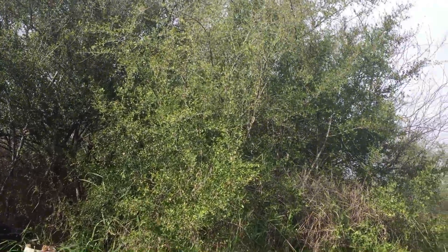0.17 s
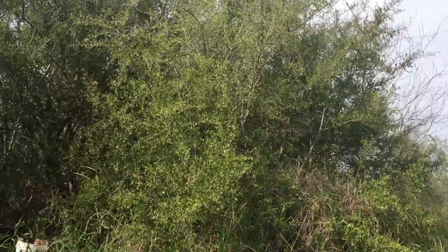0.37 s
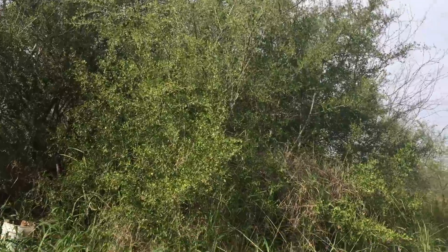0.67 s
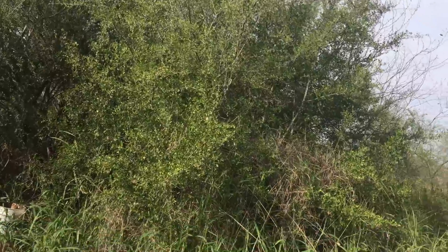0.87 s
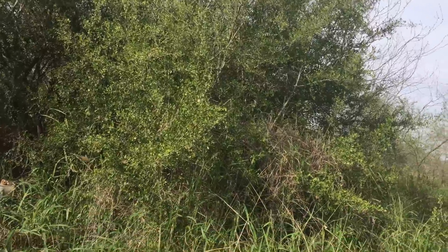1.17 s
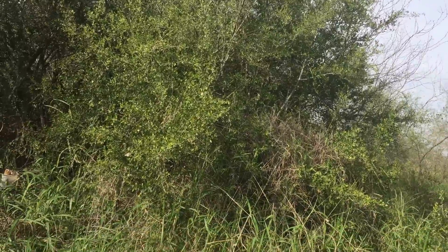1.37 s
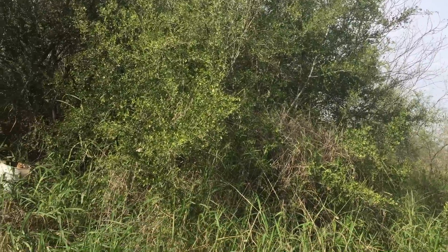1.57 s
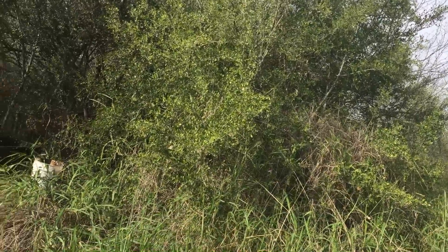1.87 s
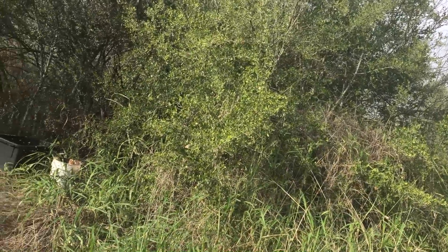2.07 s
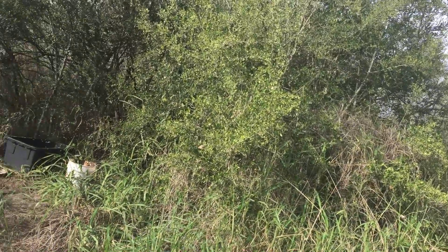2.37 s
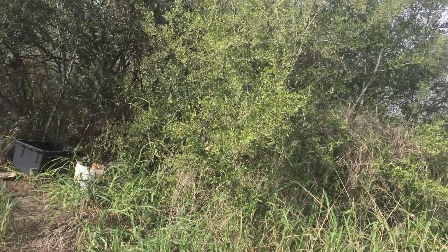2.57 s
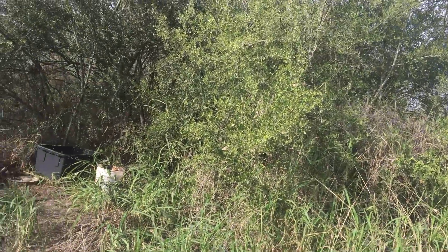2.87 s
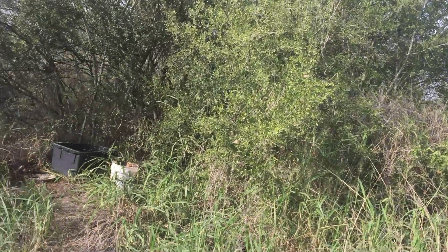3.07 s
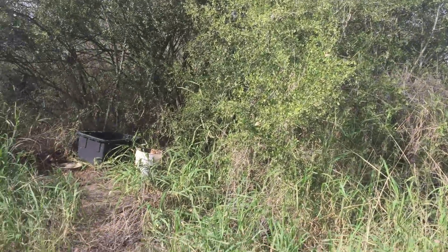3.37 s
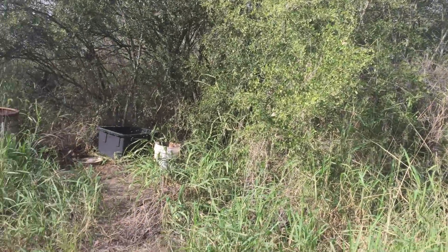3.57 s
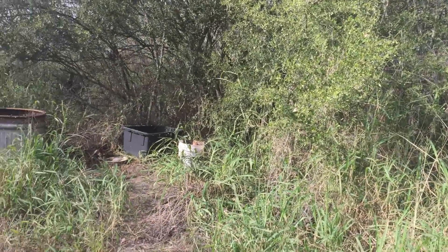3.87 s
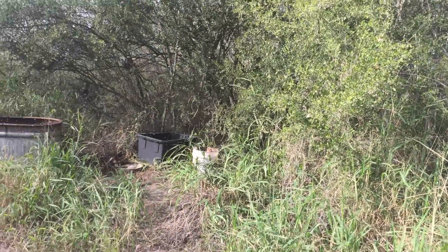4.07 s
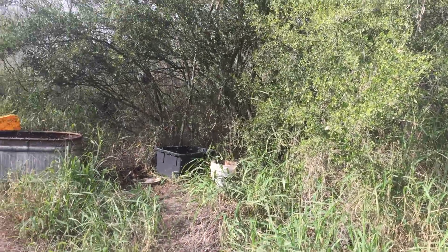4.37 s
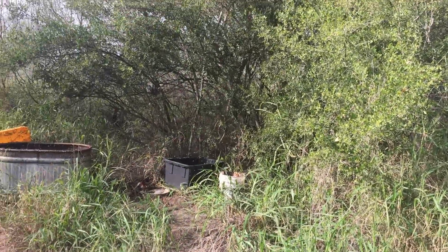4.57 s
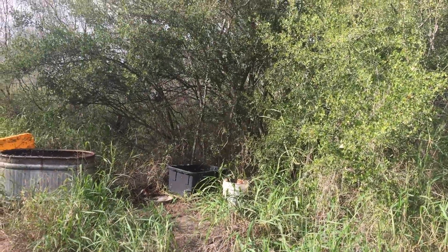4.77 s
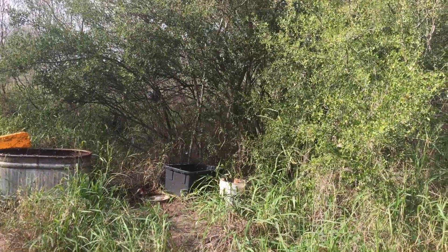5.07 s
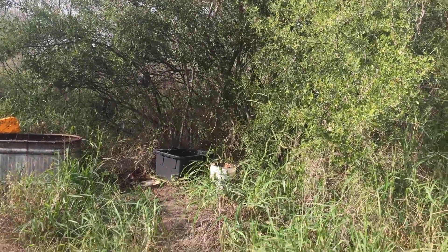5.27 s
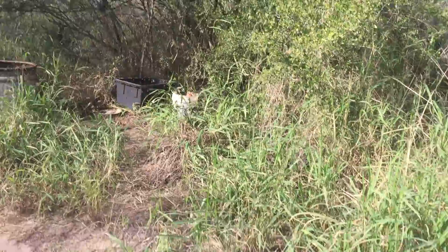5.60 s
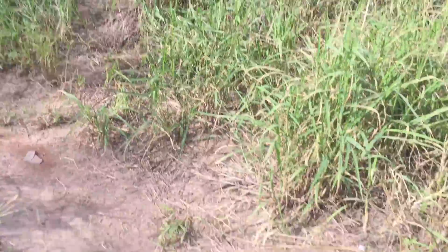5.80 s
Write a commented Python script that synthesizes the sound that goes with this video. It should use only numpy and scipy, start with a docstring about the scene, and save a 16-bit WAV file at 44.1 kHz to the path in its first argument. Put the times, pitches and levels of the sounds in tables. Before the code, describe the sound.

Outdoors among bushes and tall grass, someone bangs metal on metal with a steady arm, about seventeen blows in six seconds. Every hit is bright, harsh and quickly damped, leaving a thin hum of ringing metal. Beneath are very faint air, stirring leaves and a tiny high whine. The mono microphone overloads a little on the loudest peaks.

```python
"""A hard, dense clang comes first, repeated nearly three times a second: sheet metal struck in open brush.
Each blow excites damped modes, a circling bending wave and a decaying noise of many weaker modes.
Freely hanging metal, a sum of longer modes, rings on faintly until the next blow; a crack and a low
push mark each contact. Bushes scatter a brief diffuse tail, over quiet air, stirring leaves and a thin
high whine made of sines. Saturation of the microphone input flattens the loudest peaks."""
import sys
import numpy as np
from scipy import signal
from scipy.fft import rfft, irfft, next_fast_len
from scipy.io import wavfile
from scipy.ndimage import map_coordinates

SR = 44100
rng = np.random.default_rng(int(sys.argv[2]) if len(sys.argv) > 2 else 0)


def wav_out(sig):
    """Save sig, one row per channel (or a flat mono array), as 16-bit PCM at SR to the path in sys.argv[1]."""
    wavfile.write(sys.argv[1], SR, np.round(np.clip(np.atleast_2d(sig).T, -1, 1) * 32767).astype(np.int16))


N = 261954  # length [samples]

# blows of a steady arm, all nearly alike; every struck source plays them: (time [s], force [dB])
BLOWS = [(-.004, -2), (0.3598, -2.3), (0.7142, -1.96), (1.0598, -1.5), (1.4157, -1.5), (1.775, -1.7),
         (2.1270, -1.8), (2.484, -1.9), (2.8383, -1.5), (3.1979, -1.4), (3.5533, -1), (3.884, -1.2),
         (4.2268, -1.3), (4.5754, -1.3), (4.9195, -1.94), (5.2573, -1.6), (5.6132, -0.6)]
# damped modes of the struck sheet: (frequency [Hz], relative level [dB], t60 [s])
SHEET_MODES = [(502, -25, 0.24), (569, -22, 0.14), (712, -18, 0.16), (739, -16, 0.26), (816, -22, 0.29),
               (947, -15, 0.22), (1047, -22, 0.3), (1156, -26, 0.2), (1182, -17, 0.16), (1228, -26, 0.3),
               (1281, -25, 0.22), (1369, -11, 0.08), (1413, -24, 0.3), (1477, -14, 0.13), (1562, -23, 0.3),
               (1609, -16, 0.21), (1639, -14, 0.26), (1706, -23, 0.24), (1777, -23, 0.26), (2037, -17, 0.2),
               (2080, -13, 0.08), (2307, -21, 0.24), (2540, -14, 0.14), (2785, -12, 0.08),
               (2914, -24, 0.25), (3001, -16, 0.15), (3197, -21, 0.16), (3647, -17, 0.12),
               (4435, -18, 0.12), (4630, -17, 0.14)]
# spectrum of the sheet's crowd of overlapping modes: (frequency [Hz], relative density [dB per Hz])
CROWD_SPECTRUM = [(270, -18), (430, -6.5), (1050, -1.5), (1400, 2.5), (2300, -2), (2950, 0.5), (4250, -3),
                  (4700, 0), (5080, -4.5), (5450, 1), (5800, -4), (7400, -8), (8600, -12.5), (15500, -19)]
# how fast the crowd dies: (frequency [Hz], t60 [s])
CROWD_DECAY = [(300, 0.21), (1500, 0.22), (3000, 0.19), (6000, 0.13), (10000, 0.13), (15000, 0.11)]


def clang(crowd_db=-3, sheet_db=1.22, wave_db=-8.5, change=0.33, spread_s=.002, detune=0.0017):
    """Modal superposition: a blow sets off strong modes, a circling wave and a crowd of weaker modes."""
    size = SR // 3
    t = np.arange(size) / SR
    passes = bending_wave(t)
    usual_crowd = noise(CROWD_SPECTRUM, size)
    build_up = 1 - np.exp(-t / spread_s)  # vibration needs a moment to fill the sheet
    track = np.zeros(N)
    for blow_s, force_db in BLOWS:
        # the crowd is mostly the same each time, as the same spot is hit
        mixed_crowd = unit(usual_crowd + change * noise(CROWD_SPECTRUM, size))
        crowd = amp(crowd_db) * dying(mixed_crowd, CROWD_DECAY)
        # the sheet flexes under the blow, which shifts its pitch a little
        sheet_modes = modes(SHEET_MODES, size, tune=1 + detune * rng.standard_normal())
        sheet = amp(sheet_db) * struck(sheet_modes, scatter_db=1.05)
        wave = amp(wave_db) * struck(passes, scatter_db=2.3)
        add(track, blow_s, amp(force_db) * build_up * (sheet + wave + crowd))
    return track


def bending_wave(t, count=3, first_pass_s=.018, lap_s=.017, pass_width_s=.0045,
                 wave_hz=1685, fall_hz_per_s=3500, lap_loss_db=2.5):
    """Dispersion: high bending waves outrun low ones, so each lap is a falling chirp, weaker than the last."""
    lap = np.arange(count)[:, None]
    u = t - first_pass_s - lap_s * lap  # time from the middle of each pass
    envelope = amp(-lap_loss_db * lap) * np.exp(-.5 * (u / pass_width_s) ** 2)
    return envelope * np.sin(2 * np.pi * (wave_hz - fall_hz_per_s * u / 2) * u)


def contacts(thump_db=-24, thump_hz=80, length_s=0.0031, delay_s=0.0084,
             crack_db=-8, crack_s=0.0037, crack_hz=4000):
    """Impact excitation: a bright, decaying noise crack, then a short, low push."""
    t = np.arange(SR // 10) / SR
    u = t - delay_s
    push = amp(thump_db) * np.exp(-.5 * (u / length_s) ** 2) * np.cos(2 * np.pi * thump_hz * u)
    treble = signal.butter(1, crack_hz, "highpass", fs=SR, output="sos")
    track = np.zeros(N)
    for blow_s, force_db in BLOWS:
        bright_noise = signal.sosfilt(treble, rng.standard_normal(len(t)))
        crack = amp(crack_db) * bright_noise * np.exp(-t / crack_s)
        add(track, blow_s, amp(force_db) * (push + crack))
    return track


# modes of the metal that rings freely: (frequency [Hz], relative level [dB], t60 [s])
FREE_RING_MODES = [(89, -43, 1.6), (121, -48, 1.6), (164, -51, 1.6), (221, -49, 1.5), (240, -45, 1.6),
                   (291, -52, 1.6), (328, -49, 1.6), (447, -46, 1.6), (514, -52, 1.6), (546, -49, 1.6),
                   (703, -40, 1.6), (751, -32, 1.3), (800, -44, 1.6), (956, -37, 0.7), (1015, -38, 1.2),
                   (1063, -32, 0.7), (1225, -31, 0.6), (1279, -42, 1.6), (1343, -43, 1.6), (1373, -40, 1.1),
                   (1484, -41, 1.6), (1490, -39, 1.6), (1558, -43, 1.0), (1634, -36, 0.8), (1885, -45, 0.8),
                   (2310, -46, 0.7), (2580, -48, 0.8), (2910, -46, 0.6), (3130, -48, 0.7), (4635, -49, 0.5)]


def free_ring(stop_s=.01, detune=0.0024, waver_db=1):
    """Free vibration: long modes hum between blows; each new contact stops them and starts them afresh."""
    size = SR // 2
    t = np.arange(size) / SR
    ends = [row[0] for row in BLOWS[1:]] + [N / SR]
    track = np.zeros(N)
    for (blow_s, force_db), end_s in zip(BLOWS, ends):
        ring_modes = modes(FREE_RING_MODES, size, tune=1 + detune * rng.standard_normal())
        ring = struck(ring_modes, scatter_db=1.5)
        damping = np.exp(-np.maximum(blow_s + t - end_s, 0) / stop_s)
        sway_db = waver_db * wobble(31, size)  # the metal rocks after the blow
        add(track, blow_s, amp(force_db + sway_db) * damping * ring)
    return track


# decay of the scatter from the bushes: (frequency [Hz], t60 [s])
BRUSH_DECAY = [(200, 0.48), (1200, 0.59), (2800, 0.37), (6000, 0.22), (14000, 0.28)]


def brush(x, wet_db=-21, reach_s=0.0052):
    """Diffuse scattering: leaves and stems return a noise-like tail, drawn anew for each blow."""
    t = np.arange(SR // 2) / SR
    edges = [0] + [round(row[0] * SR) for row in BLOWS[1:]] + [N]
    track = np.zeros(N)
    for start, end in zip(edges, edges[1:]):
        tail = dying(rng.standard_normal(len(t)), BRUSH_DECAY)
        tail *= 1 - np.exp(-t / reach_s)  # the scatter takes a moment to build up
        tail /= np.linalg.norm(tail)
        add(track, start / SR, signal.fftconvolve(x[start:end], tail))
    return amp(wet_db) * track


# spectrum of still outdoor air: (frequency [Hz], relative density [dB per Hz])
AIR_SPECTRUM = [(25, -20), (55, 0), (90, -1), (200, -7), (600, -8), (1500, -9), (2300, -18), (3000, -22),
                (3800, -28), (6000, -32), (10000, -37), (15500, -41)]
# spectrum of leaves and grass stirring: (frequency [Hz], relative density [dB per Hz])
LEAVES_SPECTRUM = [(800, -28), (2500, 4.5), (5000, 0.5), (7500, -7), (10000, -16), (15000, -26.5)]


def air(air_db=-53, rustle_db=-69.7, rustle_rise_db_per_s=.6, stir_db=4.5):
    """Broadband noise: steady air, and leaves whose level wavers while slowly rising."""
    leaves_db = rustle_db + rustle_rise_db_per_s * np.arange(N) / SR + stir_db * wobble(15, N)
    return amp(air_db) * noise(AIR_SPECTRUM, N) + amp(leaves_db) * noise(LEAVES_SPECTRUM, N)


# a faint, very high whine: (frequency [Hz], rms level before the swing [dB])
WHINE_LINES = [(12620, -78.5), (13000, -85), (13400, -93.5)]


def whine(swing_db=8):
    """Phase and amplitude modulation: thin, high sines waver in phase and swell and fade together."""
    t = np.arange(N) / SR
    lines = np.zeros(N)
    for hz, db in WHINE_LINES:
        lines += amp(db) * np.sqrt(2) * np.sin(2 * np.pi * hz * t + wobble(90, N))
    return amp(swing_db * np.tanh(wobble(18, N))) * lines


def modes(table, size, tune=1):
    """Damped oscillation: one decaying sine a row, with neighbours in opposite phase so close ones beat."""
    t = np.arange(size) / SR
    hz, db, t60 = np.transpose(table)[:, :, None]
    sign = (-1) ** np.arange(len(hz))[:, None]
    return sign * amp(db - 60 * t / t60) * np.sin(2 * np.pi * hz * tune * t)


def struck(shapes, scatter_db):
    """Modal participation: each blow lands a little differently and shares its force anew."""
    return amp(scatter_db * rng.standard_normal(len(shapes))) @ shapes


def dying(x, decay):
    """Frequency-dependent damping: each frequency of x fades with its own t60."""
    hz, t, z = signal.stft(x, SR, nperseg=256)
    fade = amp(-60 * t / along(decay, hz)[:, None])
    return signal.istft(z * fade, SR, nperseg=256)[1][:len(x)]


def noise(spectrum, size):
    """Spectral shaping: white noise coloured by a spectrum and scaled to rms 1."""
    white = rng.standard_normal(size)
    return unit(filtered(white, lambda hz: amp(along(spectrum, hz))))


def filtered(x, response):
    """Linear filtering: multiply the spectrum of x by a response of frequency."""
    m = next_fast_len(len(x) + 8192)  # padding limits wrap-around
    return irfft(rfft(x, m) * response(np.fft.rfftfreq(m, 1 / SR)), m)[:len(x)]


def wobble(rate, size):
    """Random modulation: a smooth curve through random knots, rate of them a second."""
    knots = rng.standard_normal(int(size * rate / SR) + 4)
    return map_coordinates(knots, [np.arange(size) * rate / SR])


def along(points, hz):
    """Logarithmic frequency scale: read (frequency [Hz], value) points between their entries."""
    f, v = np.transpose(points)
    return np.interp(np.log(hz + 1), np.log(f + 1), v)


def amp(db):
    """Decibel law: level to amplitude gain."""
    return 10 ** (np.asarray(db) / 20)


def unit(x):
    """Normalisation: scale to rms 1."""
    return x / np.sqrt(np.mean(x ** 2) + 1e-20)


def add(track, time_s, sound):
    """Linear superposition: mix a sound into the track from time_s on, cut to fit."""
    start = round(time_s * SR)
    part = sound[max(-start, 0):len(track) - start]
    track[max(start, 0):][:len(part)] += part


def scene():
    """Superposition of the banging, its scatter and the air around it."""
    metal = clang() + free_ring()
    return (metal + contacts() + brush(metal) + air() + whine())[None]


def overload(x, ceiling=0.67, hardness=5):
    """Saturation: the input stage flattens the peaks."""
    return x / (1 + np.abs(x / ceiling) ** hardness) ** (1 / hardness)


def record(dry, low_cut_hz=32, top_hz=15800):
    """Saturation, then band limiting: the input overloads, sheds the deepest bass and cuts the top."""
    low_cut = signal.butter(2, low_cut_hz, "highpass", fs=SR, output="sos")
    x = signal.sosfilt(low_cut, overload(dry[0]))
    return filtered(x, lambda hz: 1 / (1 + (hz / top_hz) ** 120))[None]


dry = scene()
out = record(dry)
wav_out(out)
```